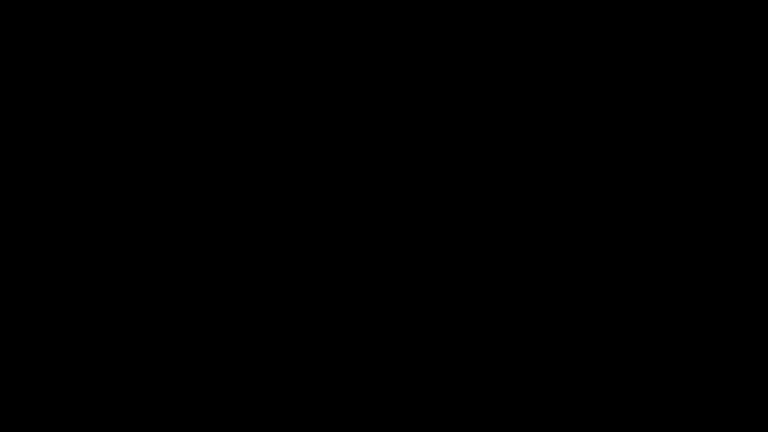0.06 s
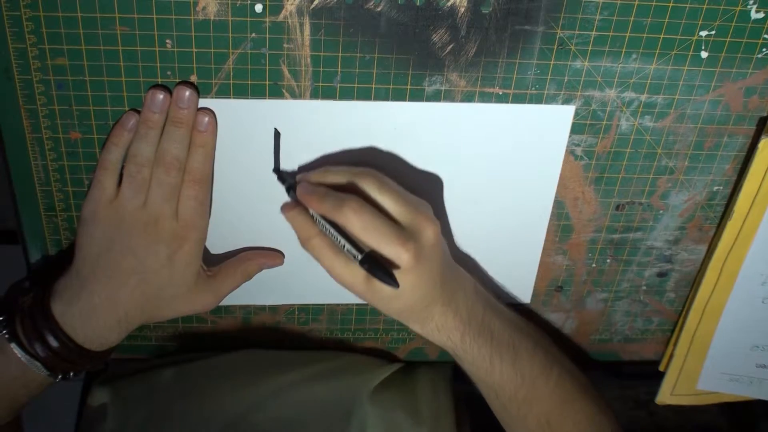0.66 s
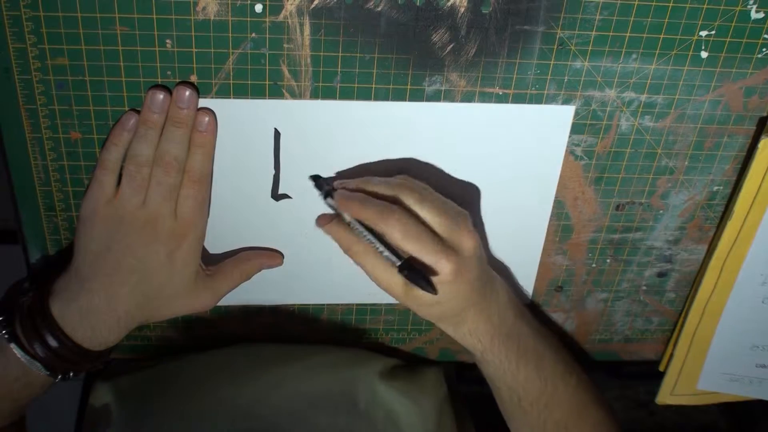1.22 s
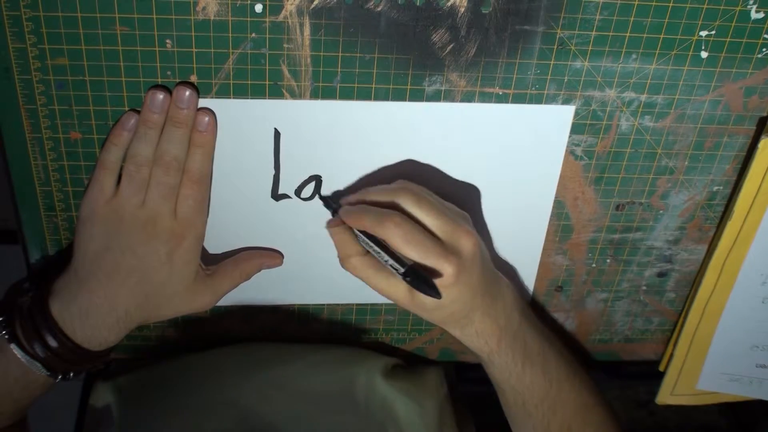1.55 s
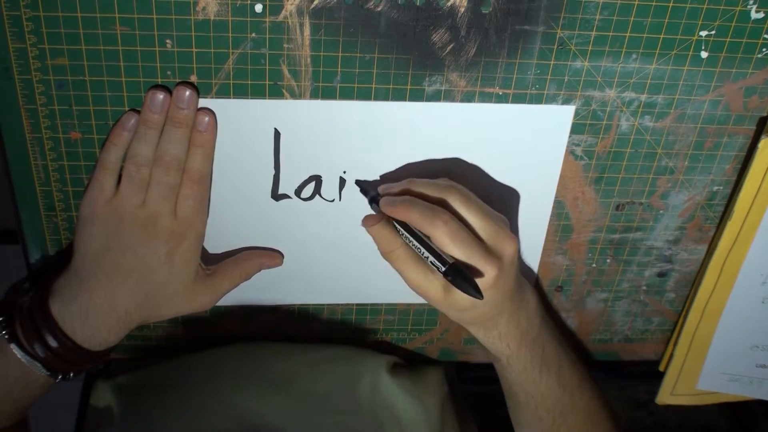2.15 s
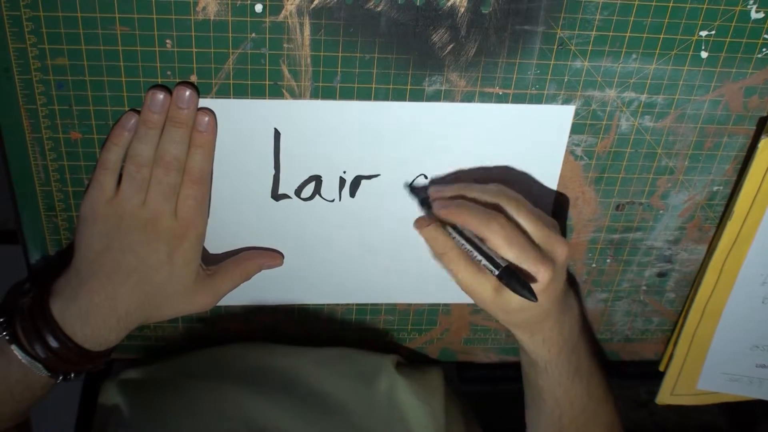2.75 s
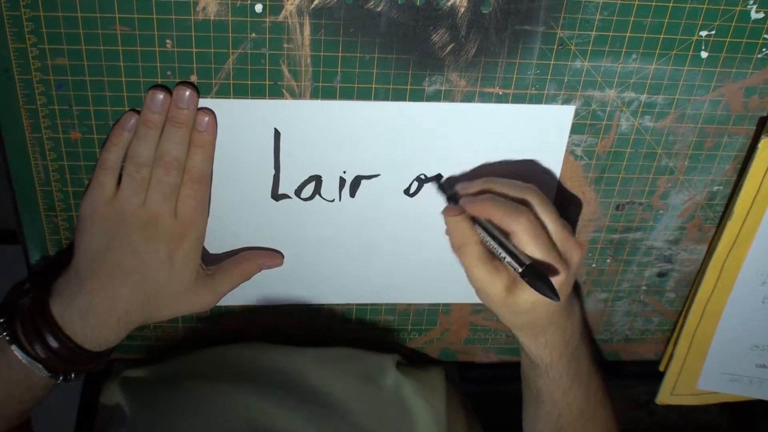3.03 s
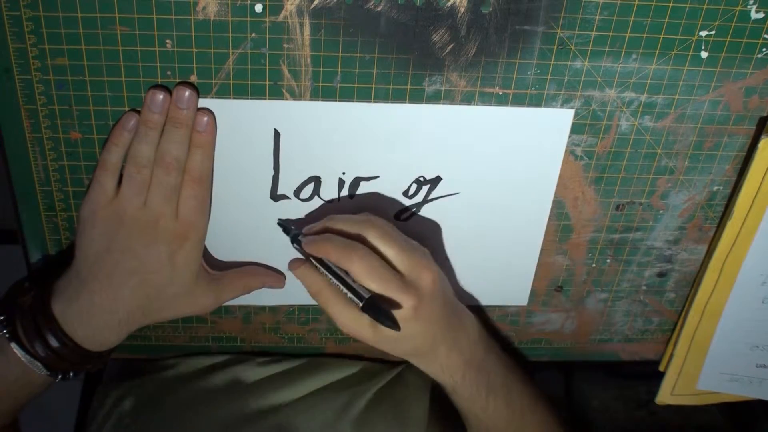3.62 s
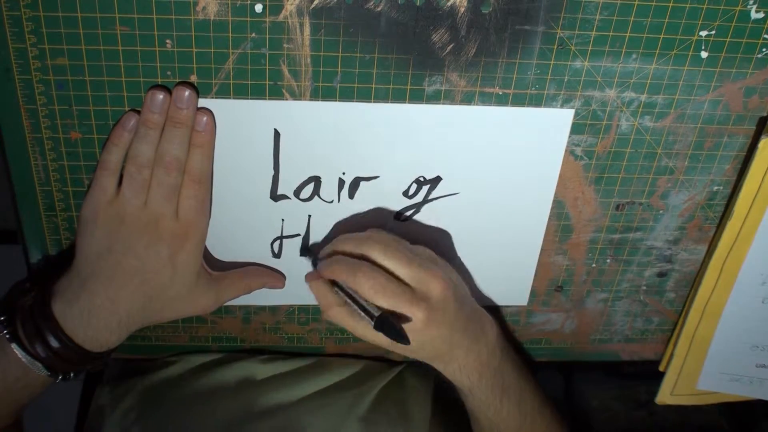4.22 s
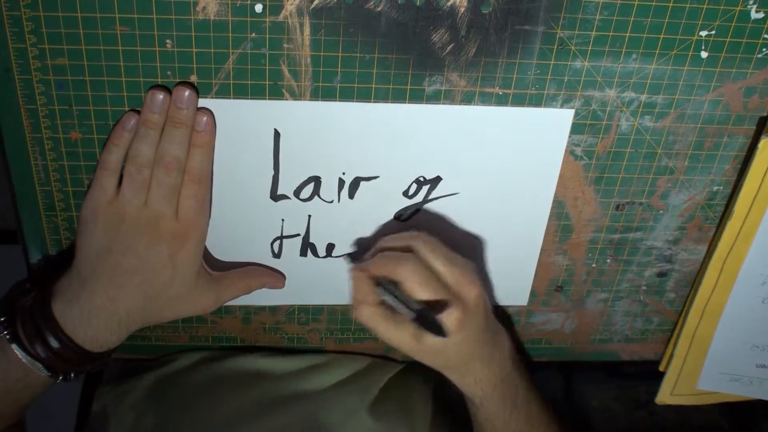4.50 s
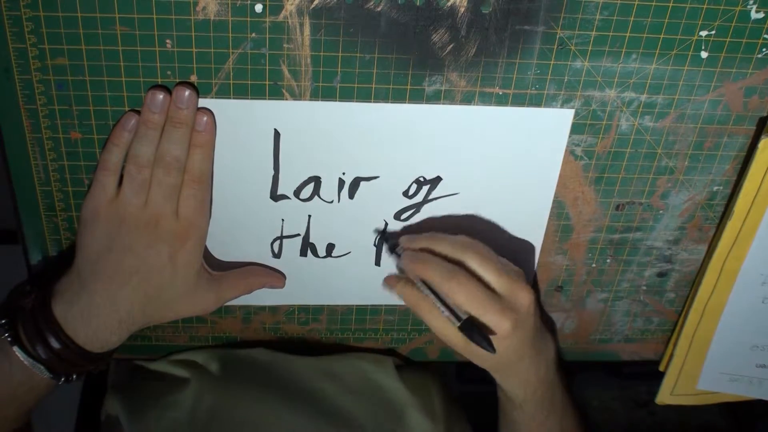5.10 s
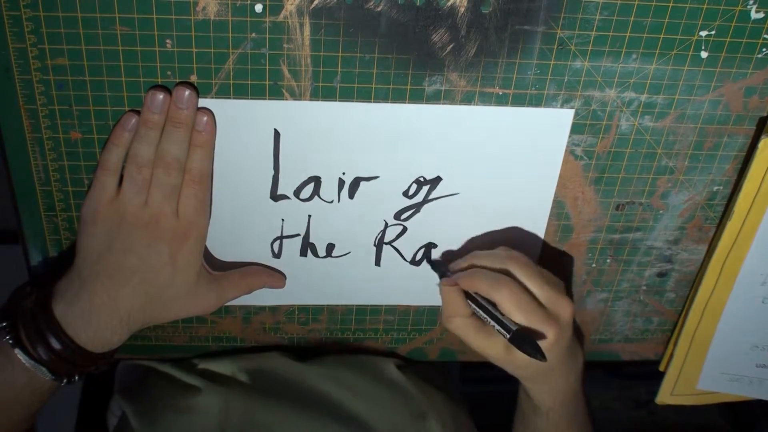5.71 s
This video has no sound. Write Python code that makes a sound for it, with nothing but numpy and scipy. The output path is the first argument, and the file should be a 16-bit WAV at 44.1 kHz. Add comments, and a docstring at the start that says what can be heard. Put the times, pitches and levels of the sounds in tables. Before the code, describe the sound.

A marker scratches across paper in short hissy strokes, with light taps on a desk and a faint fan hum.

```python
"""Marker pen on paper

A marker letters a few words on a sheet lying on a cutting mat on a wooden desk.
The felt nib catches on paper fibres and hisses; its judder and its landings shake the desk top.
The hand bumps softly on the mat. The room is small and quiet: a fan, a faint hum, a few thin tones."""
import sys
import numpy as np
from scipy import signal
from scipy.fft import rfft, irfft, next_fast_len
from scipy.io import wavfile
from scipy.ndimage import map_coordinates

SR = 44100
rng = np.random.default_rng(int(sys.argv[2]) if len(sys.argv) > 2 else 0)


def wav_record(signal):
    """Record a signal, one row per channel, as 16-bit PCM in the file named by sys.argv[1]."""
    frames = np.transpose(np.atleast_2d(signal))
    bounded = np.clip(frames, -1, 1)
    # unit amplitude maps onto the largest positive 16-bit level
    quanta = np.round(bounded * 32767).astype(np.int16)
    wavfile.write(sys.argv[1], SR, quanta)


N = 258426
T = np.arange(N) / SR


def undb(db):
    """dB to gain."""
    return 10 ** (np.asarray(db) / 20)


def unit(x):
    """Scale to rms 1."""
    return x / np.sqrt(np.mean(x ** 2) + 1e-24)


def shape(x, gain_at):
    """Zero-phase filter, gain_at(f/Hz)."""
    size = next_fast_len(x.shape[-1])
    f = np.maximum(np.fft.rfftfreq(size, 1 / SR), 1)
    return irfft(rfft(x, size) * gain_at(f), size)[..., :x.shape[-1]]


def colour(x, points):
    """Filter through (f/Hz, level/dB) points; rms 1."""
    hz, db = np.transpose(points)
    return unit(shape(x, lambda f: undb(np.interp(np.log(f), np.log(np.sort(hz)), db))))


def walk(rate_hz):
    """Smooth random drift; rms 1."""
    return unit(shape(rng.standard_normal(N), lambda f: np.exp(-(f / rate_hz) ** 2)))


def narrow_noise(hz, width_hz):
    """Noise in one resonance; rms 1."""
    return unit(shape(rng.standard_normal(N), lambda f: 1 / (1 + ((f - hz) / width_hz) ** 2)))


def swell(at_s, db, width_s):
    """Gaussian gain envelope."""
    return undb(db) * np.exp(-np.minimum(((T - at_s) / width_s) ** 2, 100))


def fade(t, t60_s):
    """Exponential decay."""
    return np.exp(-np.log(1000) * t / t60_s)


def add(out, at_s, sound):
    """Mix in place."""
    start = int(at_s * SR)
    part = sound[..., :N - start]
    out[..., start:start + part.shape[-1]] += part


def stereo(mid, side):
    """Mid/side to left/right."""
    return mid + side * np.array([[1], [-1]])


def ring(x, response):
    """Convolve with a stereo impulse response."""
    return signal.fftconvolve(x[None], response, axes=1)[:, :N]


def room(wet_db, t60_s):
    """Impulse response: direct sound plus a diffuse tail."""
    t = np.arange(SR // 3) / SR
    tail = rng.standard_normal((2, len(t))) * fade(t, t60_s) * (t > .001)
    response = undb(wet_db) * tail / np.sqrt(np.sum(tail ** 2) / 2)
    response[:, 0] = 1
    return response / np.sqrt(np.sum(response ** 2) / 2)


def fan(air_db, whir_db, diffuse_hz):
    """Steady air noise, centred in the bass and diffuse above, with wavering hum and whirs."""
    # air spectrum: f/Hz, level/dB
    air_spectrum = [(25, -8), (75, -5), (130, 1.5), (165, -1), (220, 1.5), (700, 2), (1500, 0),
                    (2100, -2.5), (3000, -4.5), (5000, -10), (8000, -13.5), (16000, -17)]
    # hum and whirs: f/Hz, width/Hz, level/dB
    whir_bands = [(75, 9.5, -82.5), (120, 5.6, -81), (312, 8.8, -74.5), (1340, 26, -71), (2070, 130, -65.5),
                  (2846, 30, -77.5)]
    air_waver_db, whir_waver_db = .3, 2.0
    mid, side = colour(rng.standard_normal((2, N)), air_spectrum)
    spread = lambda f: 0.94 * np.sqrt((0.2 + (f / diffuse_hz) ** 2) / (1 + (f / diffuse_hz) ** 2))
    air = stereo(mid, shape(side, spread)) * undb(air_db + air_waver_db * walk(rate_hz=11))
    whirs = sum(undb(db + whir_waver_db * walk(rate_hz=26)) * narrow_noise(hz, width_hz)
                for hz, width_hz, db in whir_bands)
    return air + undb(whir_db) * whirs


def writing():
    """Nib speed sets hiss and rub gain; pen slant sets brightness."""
    # nib strokes: t/s, rise/s, fall/s, hiss/dB, rub/dB, brightness/dB
    strokes = [(0.594, .004, 0.26, -49.5, -53.5, -7), (0.635, 0.18, 0.071, -42.5, -52, -8),
               (0.903, 0.016, 0.077, -54, -53.5, -16), (0.995, 0.011, 0.043, -61.5, -68, -5),
               (1.267, .05, 0.14, -51.5, -52.5, -16), (1.345, 0.02, 0.11, -49, -61, -3),
               (1.455, 0.037, 0.057, -53, -61.5, -5), (1.483, 0.031, 0.076, -41.5, -56.5, -5),
               (1.582, 0.018, 0.08, -42.5, -53.5, 0), (1.664, 0.011, 0.06, -57, -61.5, -6),
               (1.865, 0.029, 0.04, -42.5, -57, -1), (2.291, 0.045, 0.023, -41, -52, -3),
               (2.358, 0.0035, 0.08, -41.5, -56, -5), (2.41, 0.017, 0.049, -50.5, -55, -9),
               (2.46, 0.017, 0.16, -61, -57, 6), (2.75, 0.027, 0.058, -55.5, -54, -1),
               (2.805, 0.032, 0.057, -48.5, -52, 6), (2.877, 0.032, 0.033, -42.5, -57, -5),
               (2.925, 0.014, .065, -55.5, -52, 2), (2.975, 0.031, .09, -52.5, -54, -3),
               (3.088, 0.0064, 0.034, -56, -46.5, 1), (3.098, 0.039, 0.073, -40.5, -48.5, -1),
               (3.17, 0.029, 0.057, -44, -52, -5), (3.22, 0.018, 0.11, -48.5, -55, -6),
               (3.425, 0.03, 0.087, -59.5, -66, -2), (3.829, 0.011, 0.1, -49.5, -48.5, 9),
               (3.91, 0.019, 0.062, -51.5, -52, 8), (3.968, 0.023, 0.066, -49.5, -53.5, -7),
               (4.185, .04, 0.036, -47, -52, -1), (4.225, 0.025, 0.052, -37.5, -51, -8),
               (4.286, .015, 0.082, -53.5, -57.5, -10), (4.346, 0.029, 0.053, -40.5, -52, -3),
               (4.41, 0.071, 0.048, -54, -60, -6), (4.461, 0.027, 0.034, -43.5, -61, -5),
               (4.51, 0.028, 0.044, -37.5, -50.5, -6), (4.56, 0.023, 0.19, -57.5, -61, 1),
               (4.982, 0.043, 0.068, -43, -53.5, -2.5), (5.141, 0.017, 0.22, -51.5, -56.5, -2),
               (5.258, 0.034, 0.066, -48.5, -52.5, 3), (5.35, 0.072, 0.047, -48, -53.5, -3),
               (5.455, 0.018, 0.058, -56, -69, -8), (5.508, 0.11, .09, -49.5, -53, 0),
               (5.678, 0.024, 0.067, -45.5, -58.5, -2), (5.747, 0.028, 0.06, -45.5, -51, 0.5),
               (5.824, 0.024, .05, -50, -59, -8)]
    rise_power, fall_power = 0.59, 1.76
    hiss_power, rub_power = 1.18, 0.48
    hiss_energy, rub_energy = np.zeros((2, N))
    for at_s, rise_s, fall_s, hiss_db, rub_db, _ in strokes:
        t = np.arange(int((rise_s + fall_s) * SR)) / SR
        arc = np.sin(np.pi / 2 * np.interp(t, [0, rise_s, rise_s + fall_s], [0, 1, 0]))
        speed = arc ** np.where(t < rise_s, rise_power, fall_power)
        add(hiss_energy, at_s, (undb(hiss_db) * speed ** hiss_power) ** 2)
        add(rub_energy, at_s, (undb(rub_db) * speed ** rub_power) ** 2)
    at_s, rise_s, *_, bright_db = np.transpose(strokes)
    return np.sqrt(hiss_energy), np.sqrt(rub_energy), np.interp(T, at_s + rise_s, bright_db)


def catches(rate_hz, spread_db):
    """The nib catches and lets go: random impulses, rms 1."""
    hits = rng.random(N) < rate_hz / SR
    return unit(hits * rng.choice([-1, 1], N) * undb(spread_db * rng.standard_normal(N)))


def slant(x, split_hz, bright_db):
    """Pen slant tilts the spectrum about split_hz."""
    high = shape(x, lambda f: 1 / (1 + (split_hz / f) ** 10))
    return high * undb(bright_db / 2) + (x - high) * undb(-bright_db / 2)


def wander(x, common_db, ear_db, width_hz, hold_s):
    """Sheet and hand favour shifting bands as the pen travels, differently for each ear."""
    f, t, frames = signal.stft(x, SR, nperseg=256)
    grid = np.meshgrid(f / width_hz, t / hold_s, indexing="ij")
    fields = rng.standard_normal((3, 128, 256))
    common, left, right = (map_coordinates(field, grid, order=3, mode="mirror") for field in fields)
    gain = undb(common_db * common + ear_db * np.array([left, right]))
    return signal.istft(frames * gain, SR)[1][:, :N]


def nib(hiss_gain, rub_gain, bright_db):
    """Felt fibres snap over paper: bright hiss and lower rub, both fluttering with the sheet's grain."""
    # felt hiss spectrum: f/Hz, level/dB
    hiss_spectrum = [(2000, -28), (5000, -11.5), (6900, -11.5), (8100, -3), (9600, 0), (10900, 0.5),
                     (12500, 2.5), (14200, -1), (15600, -5), (18000, -7)]
    # paper rub spectrum: f/Hz, level/dB
    rub_spectrum = [(150, -20), (500, -10.5), (1200, -1), (2100, 4), (3000, 0.5), (3900, -0.5), (4800, -1),
                    (6000, -5), (8000, -1.5), (14000, -20)]
    hiss = colour(catches(rate_hz=13000, spread_db=0), hiss_spectrum)
    hiss = slant(hiss, split_hz=9500, bright_db=bright_db)
    rub = colour(catches(rate_hz=6000, spread_db=3.5), rub_spectrum)
    grain = undb(walk(rate_hz=50))
    hiss = ring(hiss * grain * hiss_gain, room(wet_db=-12, t60_s=0.042))
    rub = ring(rub * grain * rub_gain, room(wet_db=-4.5, t60_s=0.097))
    # short waves scatter off the hand: wider top
    side = shape((hiss[0] - hiss[1]) / 2, lambda f: 1.9 / (1 + (12500 / f) ** 10))
    friction = undb(0.67) * stereo(hiss, side) + undb(0.1) * rub
    return wander(friction, common_db=1.5, ear_db=1.76, width_hz=555, hold_s=.12)


def desk_response(thud_db, thud_s, modes_db, wash_db, wash_t60_s, low_cut_hz):
    """Impulse response: the top flexes once, its modes ring, the room adds a wash."""
    # desk top modes: f/Hz, level/dB, t60/s
    desk_modes = [(325, -24, 0.18), (337.5, -8.5, 0.093), (383.3, -5.5, 0.1), (477, -11, 0.033),
                  (534.8, -0.5, 0.17), (603, -5.5, 0.12), (738, -13.5, 0.13), (725, -19, 0.29),
                  (841, -2, 0.1), (868, -14.5, 0.12), (1122, -12, 0.19), (1200, 2.5, 0.033),
                  (1286, -11.5, 0.15), (1441, -3.5, 0.065), (2110, -5, 0.047), (3025, -16, 0.079)]
    # room wash spectrum: f/Hz, level/dB
    wash_spectrum = [(60, 10), (240, -15), (340, -6), (700, 6), (1000, 1.5), (1300, 11), (2000, -3),
                     (4000, -11), (10000, -18)]
    delay_s, wash_rise_s = .001, 0.00039
    t = np.arange(SR // 3) / SR
    flex = ((t - delay_s) / thud_s) ** 2
    thud = (1 - 2 * flex) * np.exp(-flex)
    age_s = np.maximum(t - delay_s, 0)
    modes = sum((-1) ** k * undb(db) * np.sin(2 * np.pi * hz * age_s) * fade(t, t60_s)
                for k, (hz, db, t60_s) in enumerate(desk_modes))
    wash_envelope = fade(t, wash_t60_s) * (1 - np.exp(-age_s / wash_rise_s))
    mid, side = colour(rng.standard_normal((2, len(t))), wash_spectrum) * wash_envelope
    blow = undb(thud_db) * thud + undb(modes_db) * modes + undb(wash_db) * stereo(mid, 0.97 * side)
    # the board radiates little bass
    return signal.sosfilt(signal.butter(2, low_cut_hz, "high", fs=SR, output="sos"), blow)


def judder(desk, rub_gain):
    """Stick-slip taps the desk: lightly while the nib glides, hard where it digs in and chatters."""
    # nib chatter: t/s, level/dB, width/s, band centre/Hz, band boost/dB
    chatters = [(0.747, -53, 0.052, 580, 3), (1.335, -57.5, 0.064, 800, 3), (2.406, -60, 0.064, 750, 4),
                (2.814, -42.5, 0.024, 523, 5.5), (2.924, -51, 0.023, 420, 12), (3.125, -59, .025, 560, 6),
                (3.162, -44.5, 0.024, 330, 19.5), (3.265, -57.5, 0.037, 360, 10),
                (3.855, -40.5, 0.018, 890, 10), (3.934, -51, 0.027, 900, 3), (4.224, -42.5, 0.011, 780, 14),
                (4.314, -53.5, 0.014, 420, 5), (4.362, -53, .016, 855, 11), (4.516, -56, .025, 706, 6),
                (5.011, -43, 0.023, 1020, 5), (5.191, -47, 0.037, 900, 1), (5.29, -42.5, 0.015, 795, 4),
                (5.609, -45.5, 0.027, 800, 3), (5.712, -52, 0.024, 340, 13), (5.774, -50.5, 0.016, 955, 10)]
    glide_db, band_octaves = -10, 0.44
    low_hz, high_hz = 210, 1400
    taps = catches(rate_hz=1100, spread_db=3.0)

    def slips(hz, boost_db):
        """Pressure and angle favour one band of the taps."""
        def gain_at(f):
            band = undb(boost_db * np.exp(-(np.log2(f / hz) / band_octaves) ** 2))
            return band / (1 + (f / high_hz) ** 4) / (1 + (low_hz / f) ** 4)
        desk_gain = np.sqrt(np.sum(shape(desk, gain_at) ** 2) / 2)
        return shape(taps, gain_at) / desk_gain

    glide = undb(glide_db) * rub_gain * slips(hz=780, boost_db=-3.5)
    chatter = sum(swell(at_s, db, width_s) * slips(hz, boost_db)
                  for at_s, db, width_s, hz, boost_db in chatters)
    return undb(-0.5) * ring(glide + chatter, desk)


def hand():
    """The heel of the hand shifts on the mat: soft, low bumps."""
    # hand shifts: t/s, level/dB, width/s
    shifts = [(1.385, -54.5, 0.017), (1.616, -57, 0.018), (2.489, -64, 0.012), (3.167, -63, 0.022),
              (4.53, -63, 0.024), (5.707, -70, 0.017)]
    # bump spectrum: f/Hz, level/dB
    spectrum = [(40, -25), (90, -9), (180, 2.5), (300, -15), (700, -5), (3000, -60)]
    envelope = sum(swell(*shift) for shift in shifts)
    return envelope * colour(rng.standard_normal(N), spectrum)


def knocks(desk):
    """Each landing pushes the desk, duller for a longer contact; the plastic tip adds a tick."""
    # pen landings: t/s, peak/dB, contact/ms, relative tick/dB
    landings = [(1.9836, -14.5, 0.14, -16.5), (2.2586, -36, 0.68, -32), (2.3880, -36.5, 0.17, -25),
                (2.475, -46, 0.32, -25), (2.8130, -38, .4, -30), (2.9225, -36, 0.61, -32),
                (3.1565, -38, 1.38, -30), (3.7605, -40, 0.39, -30), (3.8515, -46, 0.1, -25),
                (4.1605, -37, 0.62, -30), (4.2200, -40, .2, -30), (4.3560, -43.5, 0.11, -25),
                (4.941, -33.5, 0.73, -19), (5.1420, -29, 0.36, -10), (5.161, -37, 0.6, -26),
                (5.2935, -42, 0.31, -30), (5.7600, -37, 0.2, -22)]
    # tip tick spectrum: f/Hz, level/dB
    tip_spectrum = [(1000, -23), (2500, 8), (3700, 12), (5000, -2), (8000, 2), (11000, 9), (16000, 3.5)]
    blows, ticks = np.zeros((2, N)), np.zeros(N)
    t = np.arange(SR // 20) / SR
    for at_s, db, contact_ms, tick_db in landings:
        contact_s = contact_ms / 1000
        push = t * np.exp(-2 * t / contact_s)
        blow = ring(push, desk)
        add(blows, at_s - contact_s, undb(db) * blow / np.abs(blow).max())
        tick = colour(rng.standard_normal(len(t)), tip_spectrum) * fade(t, t60_s=0.029)
        add(ticks, at_s, undb(db + tick_db) * tick)
    return blows + undb(-4.5) * ring(ticks, room(wet_db=-1.5, t60_s=0.21))


def thin_tones():
    """Faint, wavering tones swell and fade in the room."""
    # tone swells: t/s, f/Hz, level/dB, width/s
    swells = [(2.727, 698, -52.5, 0.036), (4.279, 1292, -51, .014), (4.773, 1285, -57.5, 0.027),
              (4.864, 1344, -52, 0.05)]
    tones = sum(swell(at_s, db, width_s) * narrow_noise(hz, width_hz=21)
                for at_s, hz, db, width_s in swells)
    return ring(tones, room(wet_db=-3.5, t60_s=0.082))


def scene():
    """Pen, desk and hand over the quiet room."""
    desk = desk_response(thud_db=7, thud_s=0.00041, modes_db=-6.5,
                         wash_db=-14, wash_t60_s=0.2, low_cut_hz=195)
    hiss_gain, rub_gain, bright_db = writing()
    pen = nib(hiss_gain, rub_gain, bright_db) + judder(desk, rub_gain) + knocks(desk)
    return pen + hand() + thin_tones() + fan(air_db=-57.5, whir_db=-1.5, diffuse_hz=436)


def record(dry):
    """Switch-on after brief silence; steep low-pass."""
    on_s, ramp_s, top_hz = 0.291, 0.003, 15800
    gate = np.clip((T - on_s) / ramp_s, 0, 1)
    return signal.sosfilt(signal.ellip(10, .2, 70, top_hz, fs=SR, output="sos"), dry * gate)


dry = scene()
out = record(dry)
wav_record(out)
```